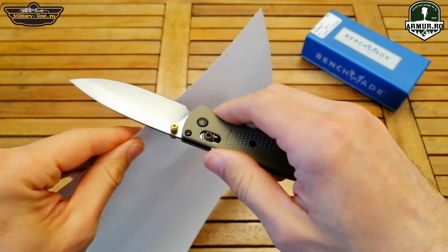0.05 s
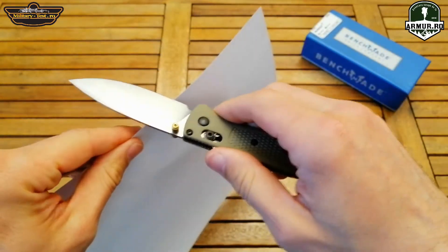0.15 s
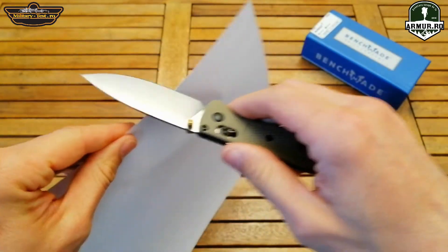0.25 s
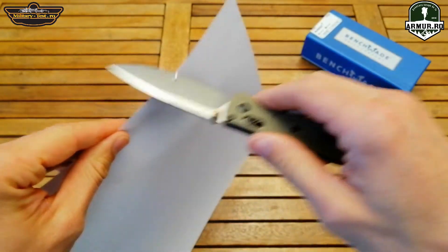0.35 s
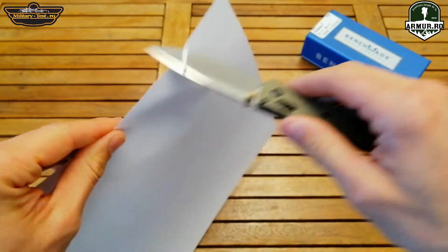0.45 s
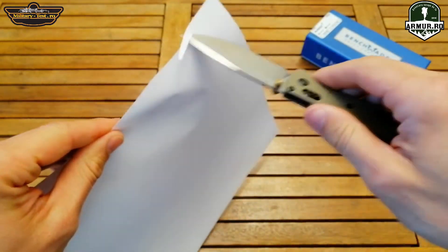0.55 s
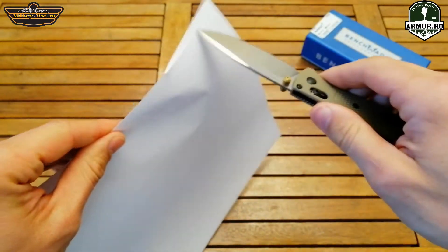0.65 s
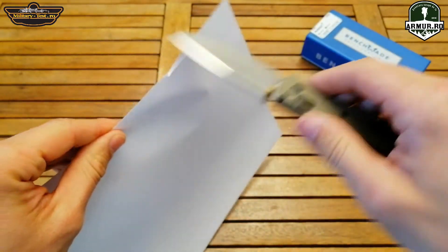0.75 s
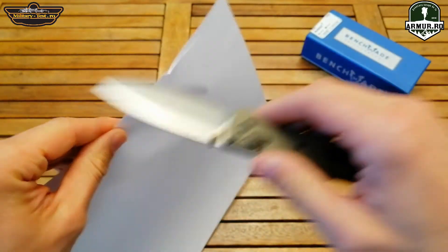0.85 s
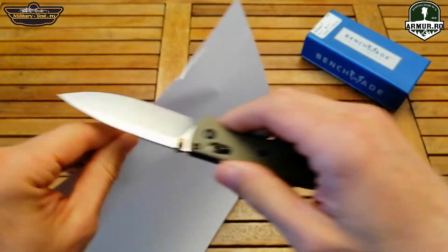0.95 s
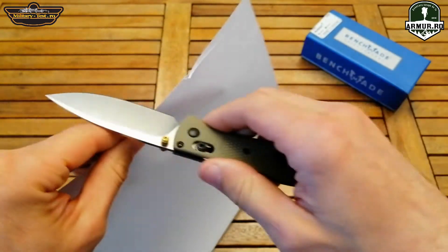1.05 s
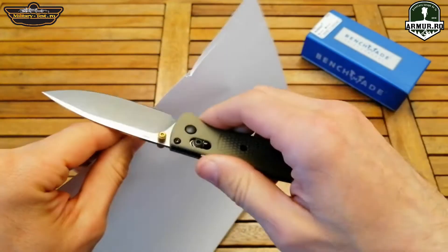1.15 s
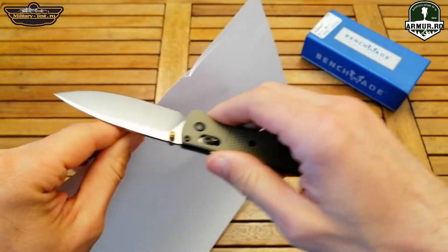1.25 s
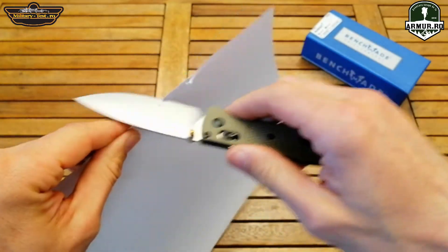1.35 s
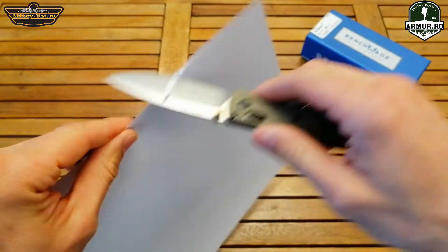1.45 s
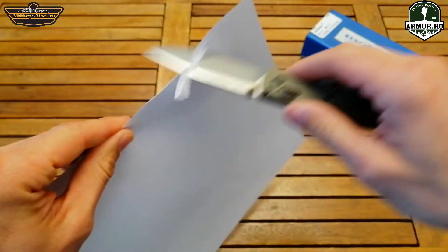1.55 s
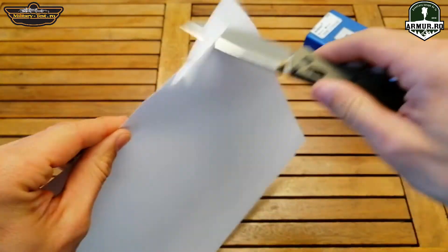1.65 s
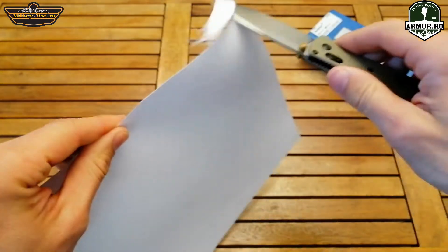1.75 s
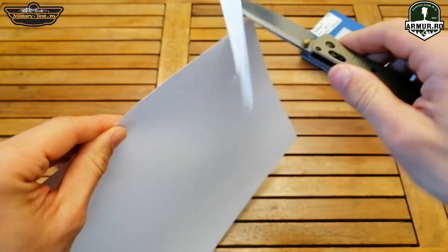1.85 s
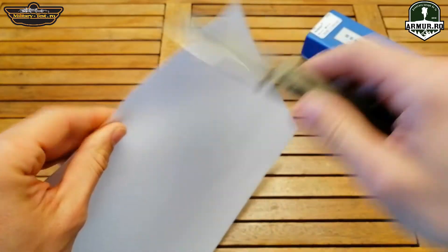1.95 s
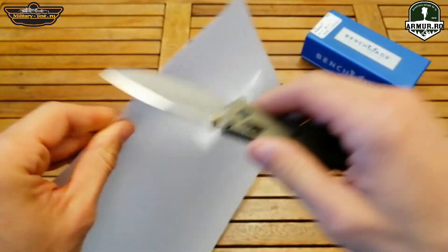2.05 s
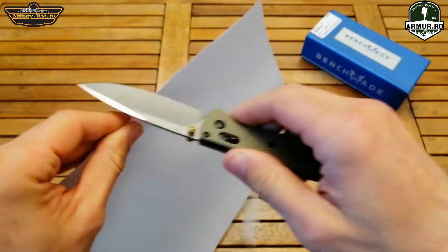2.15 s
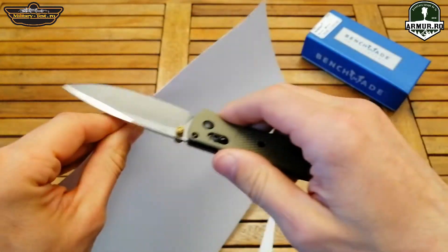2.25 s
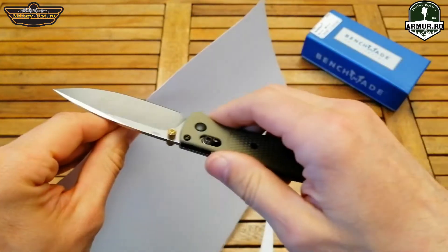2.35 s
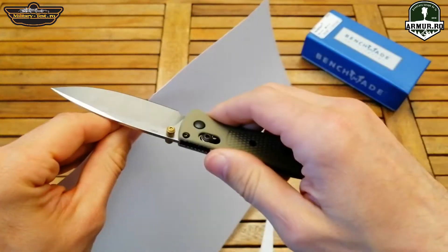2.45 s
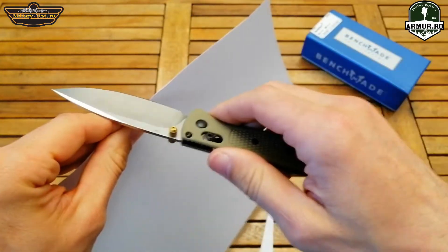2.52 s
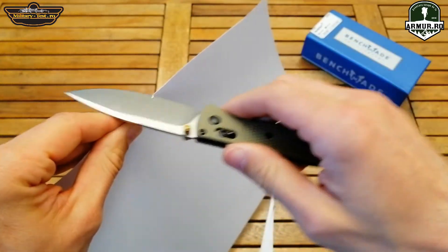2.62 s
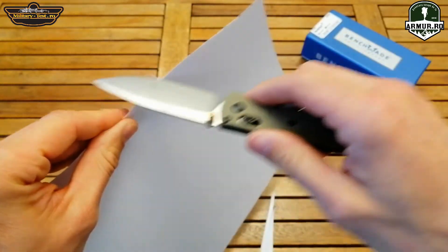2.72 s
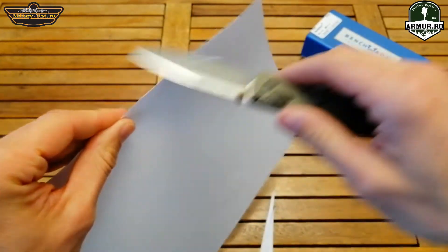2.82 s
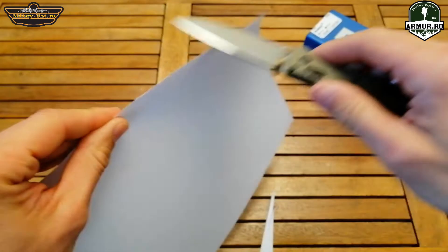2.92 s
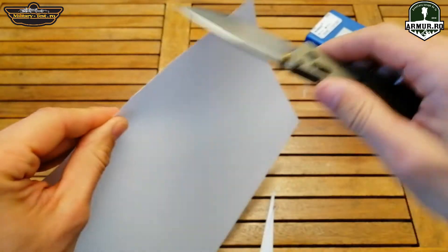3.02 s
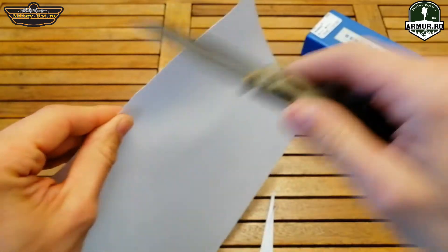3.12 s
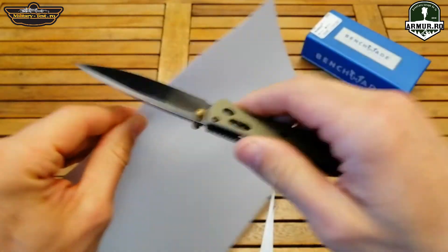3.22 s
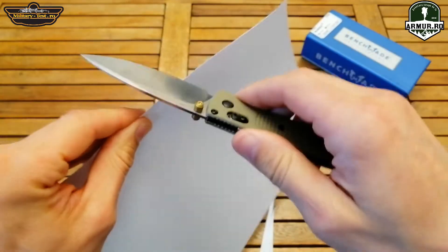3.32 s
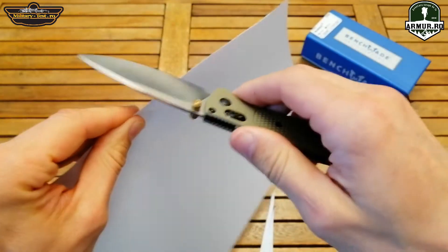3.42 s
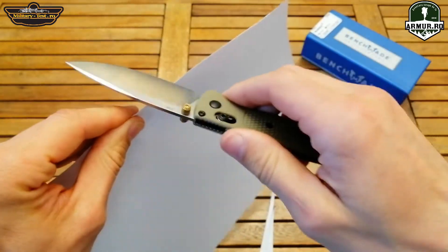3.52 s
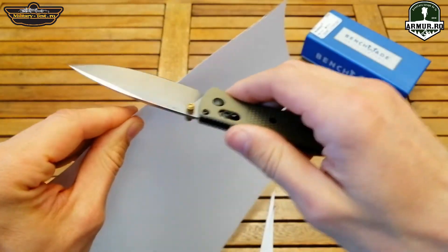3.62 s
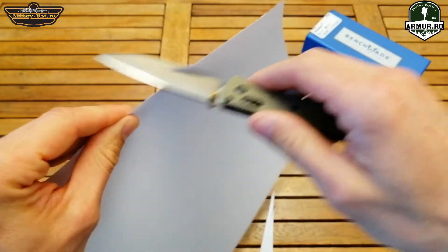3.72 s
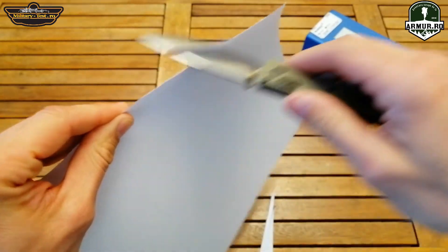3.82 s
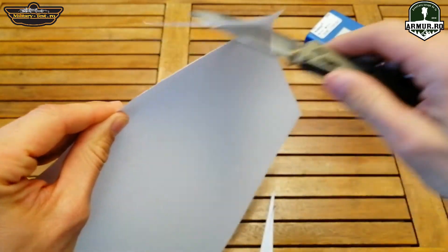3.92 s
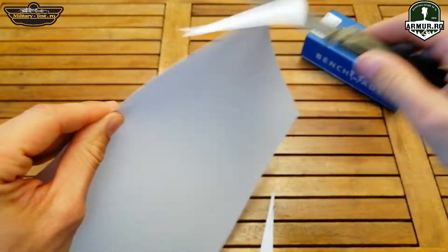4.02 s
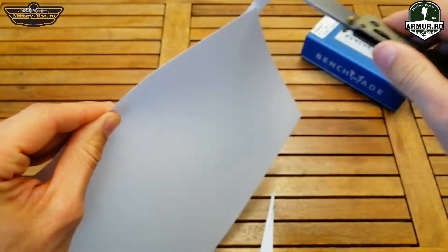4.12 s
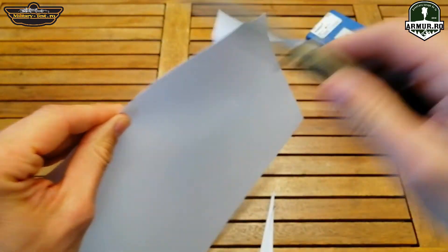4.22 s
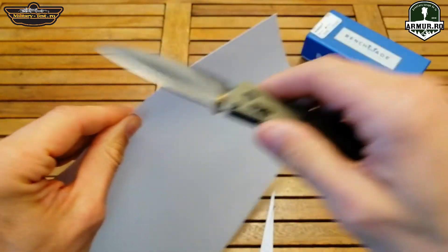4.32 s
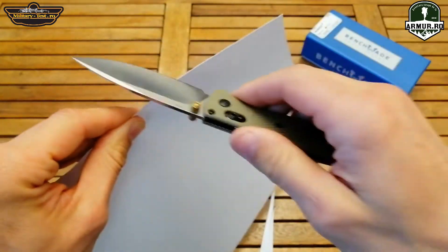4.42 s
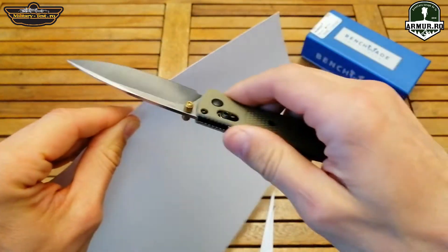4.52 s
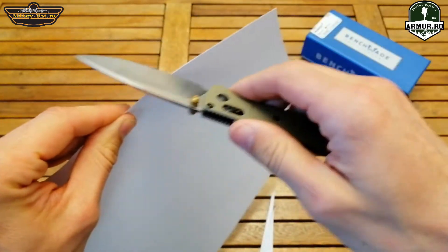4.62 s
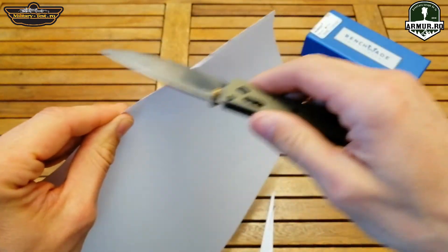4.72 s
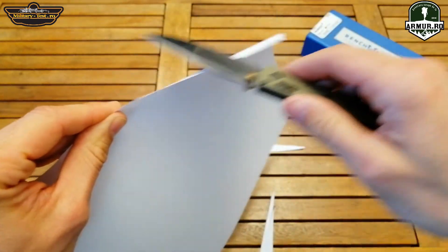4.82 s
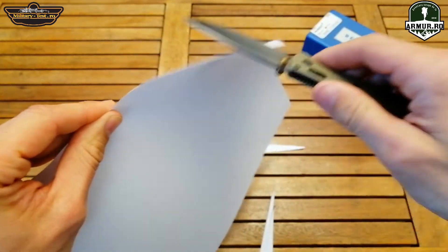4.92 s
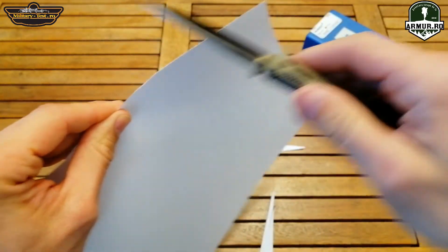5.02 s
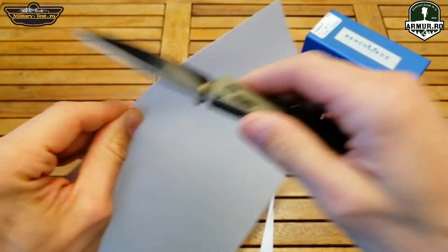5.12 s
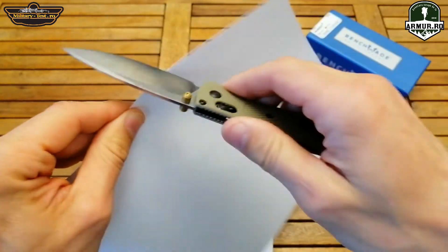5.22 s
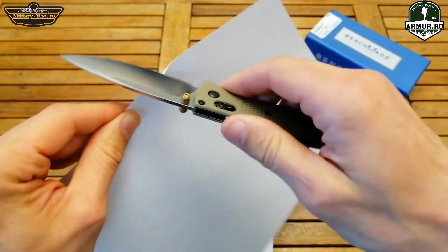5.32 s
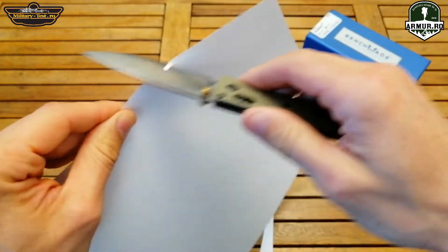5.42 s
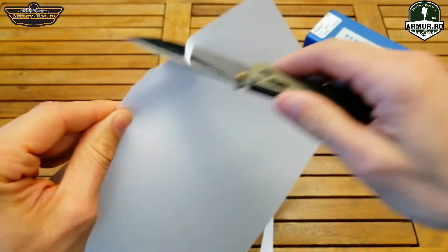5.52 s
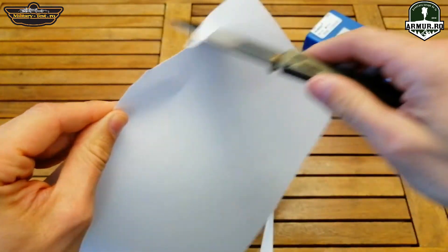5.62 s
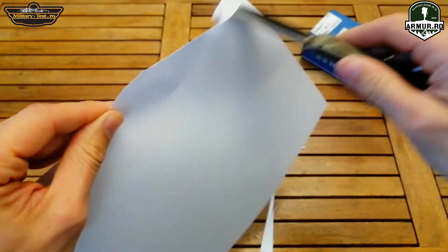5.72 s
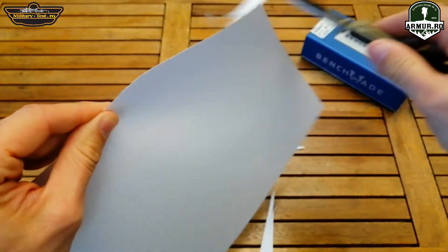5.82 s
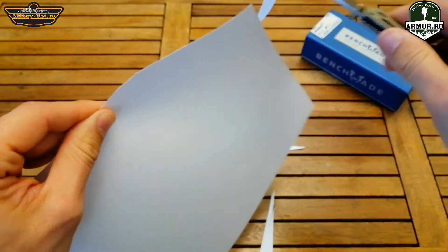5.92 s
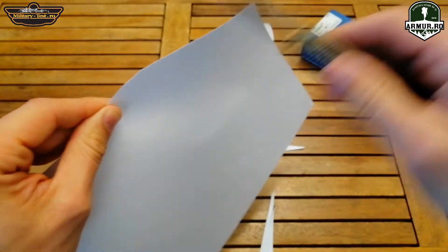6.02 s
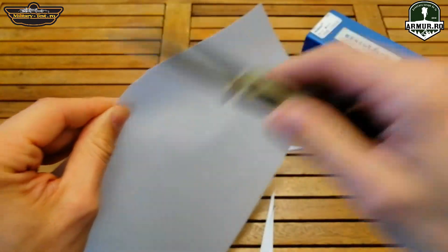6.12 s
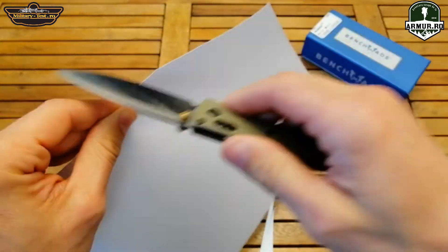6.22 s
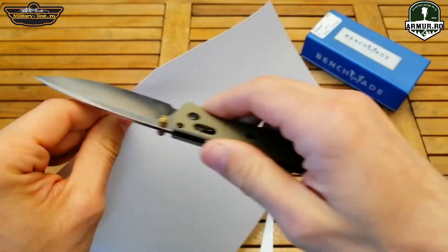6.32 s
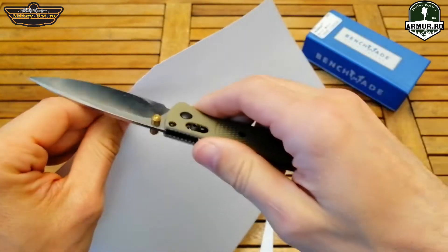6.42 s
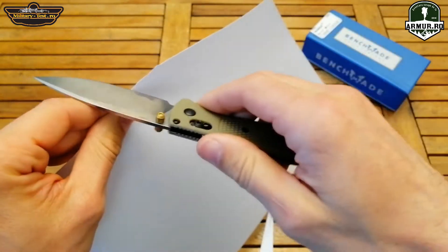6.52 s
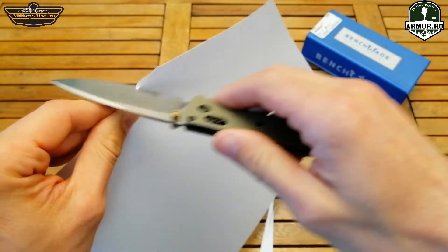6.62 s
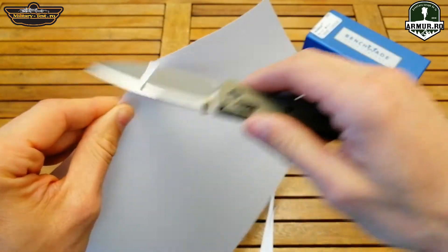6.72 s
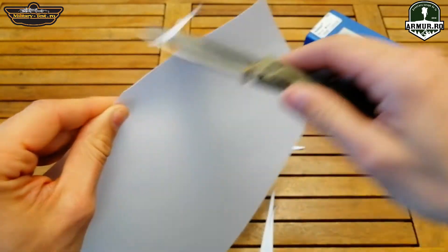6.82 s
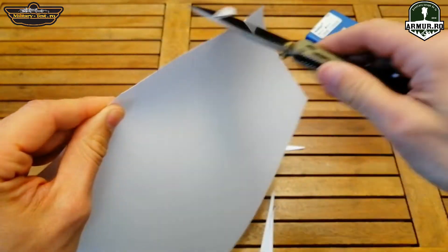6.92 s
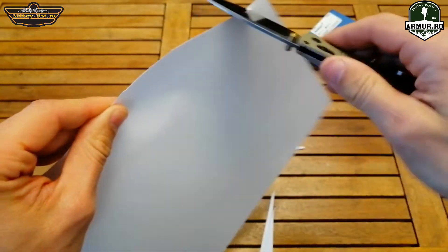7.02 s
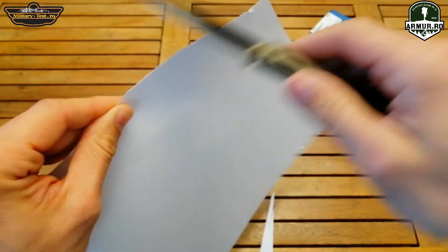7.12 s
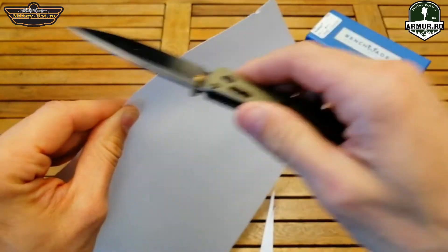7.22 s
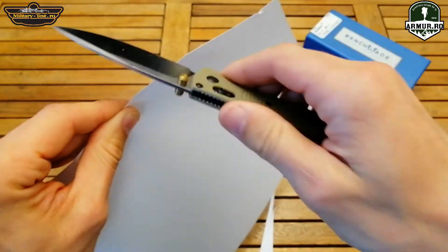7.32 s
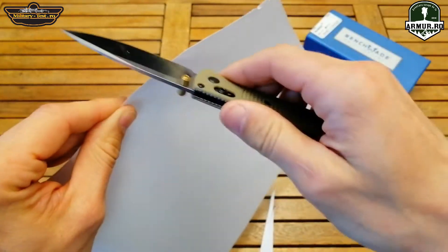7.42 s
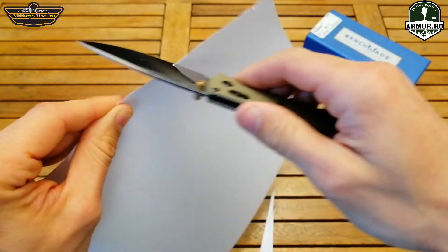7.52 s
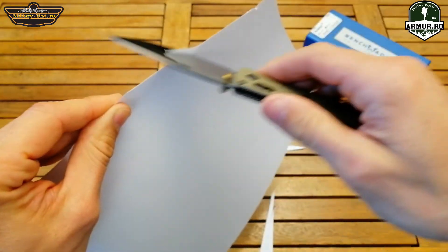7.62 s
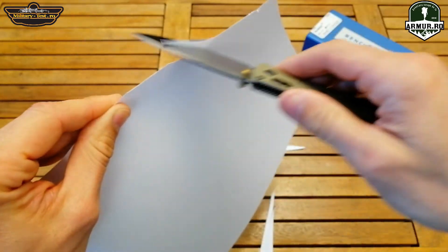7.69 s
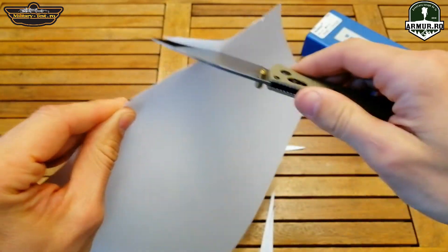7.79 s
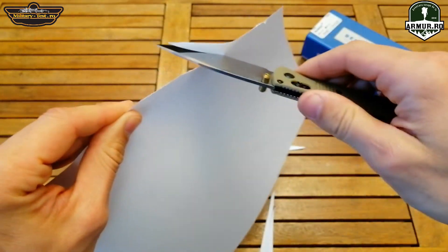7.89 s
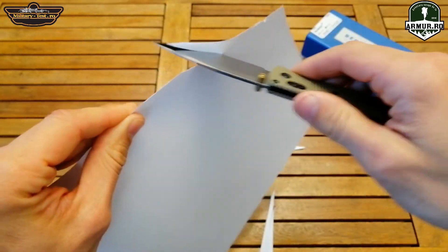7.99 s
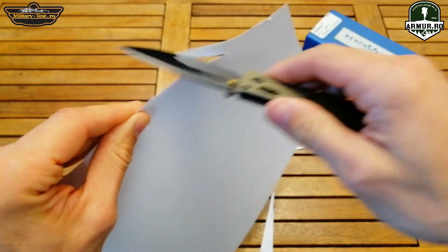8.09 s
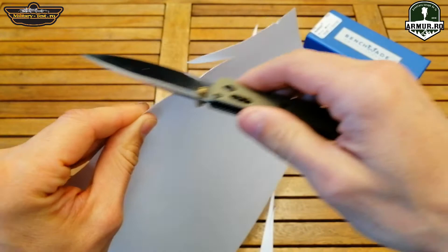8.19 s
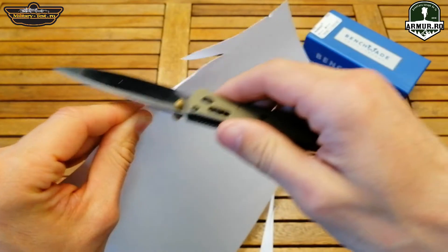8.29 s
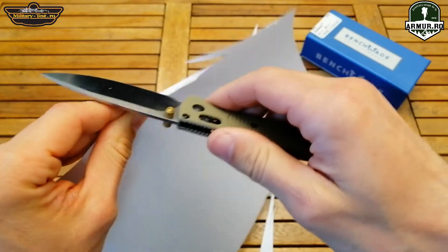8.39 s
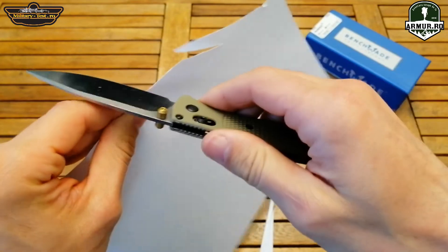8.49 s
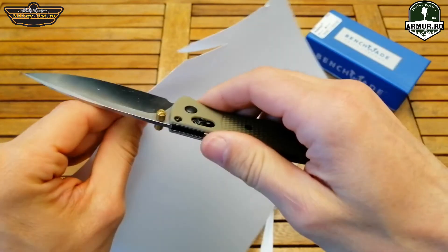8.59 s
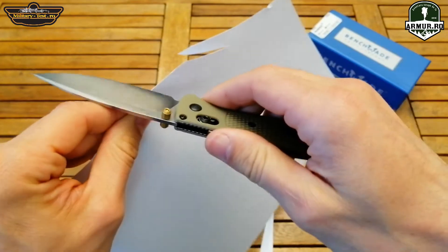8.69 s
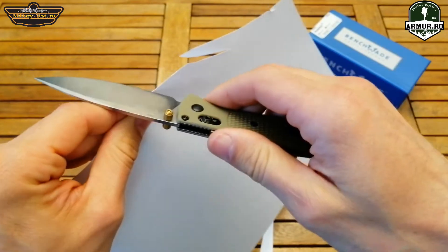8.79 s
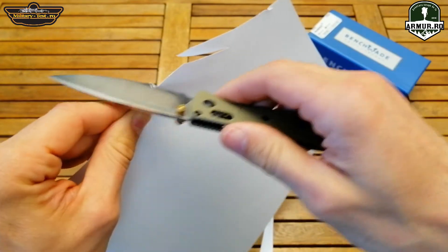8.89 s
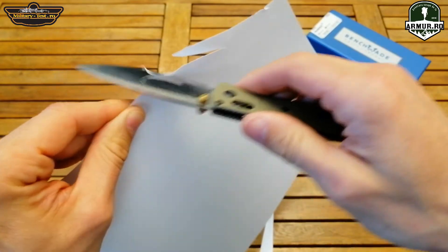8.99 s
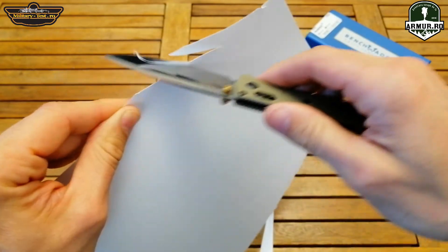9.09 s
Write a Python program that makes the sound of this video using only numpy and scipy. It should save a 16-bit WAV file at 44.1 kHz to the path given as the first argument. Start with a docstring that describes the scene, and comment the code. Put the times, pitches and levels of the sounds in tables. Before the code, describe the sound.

Quiet room, close stereo microphone, low rumble and faint hiss throughout, short reverberation. After a faint brush, a knife slices paper at 0.3 s for 0.4 s, a grainy bright rasp with a low sheet flutter. A tick and papery pop at 1.2 lead to a louder, swelling half-second zip at 1.4, ending in a tick and shudder near 1.9. Small ticks and brushes follow at 2.1-2.4. A soft cut at 2.7 runs almost into a short strong rip at 3.0, with a snap at 3.1. Another strong slice at 3.7 ends in a buckle at 4.1; light ticks at 4.5. A faint short stroke at 4.8 meets a fading one at 4.9. A fizzy, growing cut at 5.5 ends in pops at 5.9. Two strokes at 6.7 and 7.0 finish with a sharp snap. A crisp slice at 7.6, quiet brushing from 8.15 to 8.9, then a final soft cut at 8.95.

```python
"""A sharp knife slices strips off a hand-held sheet of paper; two close microphone ports hear it from one side.
Each stroke is a dense run of snapping fibres, noise pulses coloured by the sheet and the growing strip.
Between strokes the blade brushes the sheet and ticks on its edge; the loose sheet shudders in bands of
noise and buckles with short damped pops. A short reverberation and a low, swelling room tone lie behind."""
import sys
import numpy as np
from scipy import signal
from scipy.fft import rfft, irfft, next_fast_len
from scipy.io import wavfile
from scipy.ndimage import uniform_filter1d

SR = 44100
rng = np.random.default_rng(int(sys.argv[2]) if len(sys.argv) > 2 else 0)


def wrap_up_sound(samples):
    """Save the sound to the file named by the first command line argument, as 16-bit audio."""
    columns = np.atleast_2d(samples).T
    # keep every value between -1 and 1, then stretch to whole-number steps
    tamed = np.clip(columns, -1, 1)
    steps = np.round(tamed * 32767).astype(np.int16)
    wavfile.write(sys.argv[1], SR, steps)


N = 403515

# strokes of the edge: [start/s, length/s, first bite/dB, full level/dB, settling/s, release/s,
#   body re rasp/dB before SHEET_BODY_DB, fizz re rasp at start/dB, at end/dB, left re right at start/dB,
#   strip resonance at start/Hz, its height/dB, taut sheet resonance/Hz]
STROKES = [(0.296, 0.41, -55.5, -35, 0.055, 0.24, -7.5, -2, -0.5, -0.5, 4665, 9, 480),
           (1.403, 0.48, -47.5, -26, .16, 0.027, -12.5, -4, -11, -2.5, 6400, 2.5, 918),
           (2.679, 0.3, -67.5, -37, 0.048, 0.1, -8.5, -5.5, -6, -4, 7260, -0.5, 661),
           (3.024, 0.11, -54.5, -27, 0.12, 0.044, -4, -15, -9, -4, 5900, 9, 1116),
           (3.729, 0.4, -54.5, -27.5, 0.078, 0.014, -9.5, -1, -13.5, -4.5, 6720, 3, 1122),
           (4.789, 0.12, -71.5, -40, 0.034, 0.06, -2.5, -2, -4, 0, 8680, 0.5, 1000),
           (4.922, 0.18, -39.5, -66, .25, 0.062, -11, -12.5, -6, -6, 6800, 3, 910),
           (5.5, 0.43, -42, -26, 0.39, 0.052, -8, 4.5, -7.5, -2, 5450, 5, 720),
           (6.736, 0.18, -43, -34, 0.075, 0.26, -12, -3, 1, -2, 8400, 4.5, 760),
           (6.992, 0.11, -44, -26.5, 0.05, 0.038, -10.5, -26, -6.5, -9, 7000, 9, 850),
           (7.604, 0.3, -53.5, -32, 0.049, 0.014, -8, 2.5, -10.5, -4.5, 5990, 5.5, 620),
           (8.956, 0.19, -58.5, -37, 0.068, 0.11, -3.5, -5, 1, -2.5, 5400, 11.5, 750)]
SHEET_BODY_DB = 3.0  # added to the body of every stroke
# as the strip grows, the body fades, the strip curls toward the right port and its resonance sinks
BODY_DB_PER_S, CURL_DB_PER_S, STRIP_HZ_PER_S = -15, -9.5, -1200
BITE_S = 0.018  # the edge enters the paper
DULLING_POWER = 1.29  # above 1: the fizz changes mostly late in a stroke
STRIP_FORMS_S = 0.04  # the strip must come loose before it rings
SHEET_PEAK_DB, SHEET_WIDTH_HZ = 3, 260  # sheet resonance, at a new tension for each stroke
PORT_LAG_S = 0.0002086  # the right port hears the paper later


def gain_of(db):
    """Decibels to amplitude."""
    return 10 ** (np.asarray(db) / 20)


def evened(x):
    """Scales to unit rms."""
    return x / np.sqrt(np.mean(x ** 2) + 1e-20)


def read(points, hz, axis=1):
    """One column of a table, joined by straight lines over log frequency."""
    table = np.array(points, float)
    return np.interp(np.log(hz + 1), np.log(table[:, 0] + 1), table[:, axis])


def band(x, lo_hz, hi_hz, order=4):
    """Causal Butterworth band-pass."""
    sos = signal.butter(order, [lo_hz, min(hi_hz, SR / 2 - 100)], "band", fs=SR, output="sos")
    return signal.sosfilt(sos, x)


def add(mix, start_s, sound):
    """Mixes a stereo sound in at a start time."""
    part = mix[:, max(round(start_s * SR), 0):][:, :sound.shape[1]]
    part += sound[:, :part.shape[1]]


def since(start_s, length_s):
    """The samples that an event covers, and the time since its start."""
    first = max(round(start_s * SR), 0)
    at = np.arange(first, min(round((start_s + length_s) * SR), N))
    return at, (at - at[0]) / SR


def held(t, rise_s, length_s, release_s):
    """Linear rise, hold until the length, then a fall of 60 dB in the release time."""
    return np.minimum(t / rise_s, 1) * gain_of(-60 * np.maximum(t - length_s, 0) / release_s)


def slicing(voice):
    """The edge bites, settles to its full pull, and lets go as the strip comes free."""
    out = np.zeros((2, N))
    for start, length, bite_db, full_db, settle, release, body_db, fizz_start, fizz_end, pan_db, *_ in STROKES:
        at, t = since(start, length + release)
        grown = np.minimum(t, length)
        pull = gain_of(full_db + (bite_db - full_db) * np.exp(-grown / settle))
        body = SHEET_BODY_DB + body_db + BODY_DB_PER_S * grown
        fizz = fizz_start + (fizz_end - fizz_start) * (grown / length) ** DULLING_POWER
        colour = blend(voice[..., at], body, fizz, pan_db + CURL_DB_PER_S * grown)
        add(out, start, pull * held(t, BITE_S, length, release) * colour)
    return out


def paper_voice():
    """The snaps as the sheet's body, the strip's rasp and the fibres' own fizz, each at unit rms."""
    # radiation of the sheet at each port: [f/Hz, left/dB, right/dB]
    radiation = [(150, -33, -38.5), (326, -21, -25), (665, -9.5, -12), (1680, -16.5, -9),
                 (2390, -8.5, -9.5), (2870, -5.5, -1), (3900, -11, -8.5), (5480, -3, 4), (5900, -8, 3.5),
                 (7076, -7, 7), (7640, -7.5, -9), (7920, -6, -11.5), (9020, -16, -21), (12300, -28, -28),
                 (16000, -32.5, -30)]
    snaps = fibres(per_s=12000, spread_db=1.5, rub=0.44, catch_db=1.1)
    cut = ports(snaps, lambda hz: read(radiation, hz, axis=1), lambda hz: read(radiation, hz, axis=2))
    body, rasp, fizz = split(bending(cut, shared_db=3.0, own_db=2.5, width_hz=250))
    return np.array([evened(body), [evened(side) for side in rasp], evened(fizz)])


def fibres(per_s, spread_db, rub, catch_db):
    """Fibres snap in clumps as the edge catches and slips, over the smooth rub of the blade's flank."""
    sizes = gain_of(spread_db * np.minimum(rng.exponential(1, N), 4))
    snaps = (rng.random(N) < per_s / SR) * sizes
    catch = evened(band(rng.standard_normal(N), 25, 450, order=1))
    return (evened(snaps) + rub) * gain_of(catch_db * catch) * rng.standard_normal((2, N))


def ports(pair, left=None, right=None):
    """Two unrelated signals become the partly alike, slightly delayed sound of the sheet at two ports."""
    # likeness of the two ports: [f/Hz, correlation 0-1]
    likeness = [(100, 0.99), (700, 1), (1500, 0.49), (2400, 0.81), (3500, 0.04), (14000, 0.59)]
    size = next_fast_len(pair.shape[1] + 512)
    hz, (a, b) = np.fft.rfftfreq(size, 1 / SR), rfft(pair, size)
    same = np.clip(read(likeness, hz), 0, .99)
    partly_alike = same * a + np.sqrt(1 - same ** 2) * b
    z = np.array([a, partly_alike * np.exp(-2j * np.pi * hz * PORT_LAG_S)])
    if left is not None:
        z *= gain_of([left(hz), right(hz)])
    return irfft(z, size)[:, :pair.shape[1]]


def bending(x, shared_db, own_db, width_hz):
    """The strip's resonance glides as it is cut free; narrow bands rise and fall as the sheet bends."""
    hz, t, z = signal.stft(x, SR, nperseg=512, noverlap=384)
    drift = rng.standard_normal((len(t), len(hz), 3)).T
    for size, axis in ((3, 1), (24, 2), (10, 2)):  # smooth over frequency, then twice over time
        drift = uniform_filter1d(drift, size=size, axis=axis)
    drift = evened(drift)
    treble = np.minimum(hz / 3400, 1)[:, None]  # long waves reach both ports alike
    wander_db = shared_db * drift[2] + own_db * treble * drift[:2]
    z *= gain_of(resonances(hz[:, None], t, width_hz) + wander_db)
    return signal.istft(z, nperseg=512, noverlap=384)[1][:, :N]


def resonances(hz, t, width_hz):
    """Lift in dB from the sheet's resonance and the strip's, which forms and then sinks as the strip grows."""
    cuts = np.array(STROKES)
    latest = np.maximum(np.searchsorted(cuts[:, 0], t) - 1, 0)
    start, length, *_, strip_hz, height_db, sheet_hz = cuts[latest].T
    grown = np.clip(t - start, 0, length)
    formed_db = height_db * (1 - np.exp(-grown / STRIP_FORMS_S)) * (t < start + length)
    strip = formed_db / (1 + ((hz - strip_hz - STRIP_HZ_PER_S * grown) / width_hz) ** 2)
    return strip + SHEET_PEAK_DB / (1 + ((hz - sheet_hz) / SHEET_WIDTH_HZ) ** 2)


def split(x):
    """Body, rasp and fizz: three registers, parted at 2300 and 8000 Hz, that add up to the whole."""
    size = next_fast_len(N)
    hz, z = np.fft.rfftfreq(size, 1 / SR), rfft(x, size)
    low = 1 / (1 + (hz / 2300) ** 10)
    high = 1 - 1 / (1 + (hz / 8000) ** 24)
    return [irfft(z * share, size)[:, :N] for share in (low, 1 - low - high, high)]


def blend(voice, body_db, fizz_db, pan_db):
    """Body and fizz around the rasp, which the strip turns toward one port or the other."""
    body, rasp, fizz = voice
    right_share = 1 / (1 + gain_of(pan_db) ** 2)  # of the power
    turn = np.sqrt([2 * (1 - right_share), 2 * right_share]).reshape(2, -1)
    return gain_of(body_db) * body + turn * rasp + gain_of(fizz_db) * fizz


def brushing(voice, fizz_db=-4, pan_db=-6, arch_power=0.52):
    """The blade's flank slides lightly over the sheet without cutting, swelling and fading in one arch."""
    # brushes: [start/s, length/s, level/dB, body re rasp/dB]
    brushes = [(0.13, 0.17, -68.5, 5.5), (0.827, 0.033, -54.5, -16), (1.139, 0.043, -69, 0),
               (2.299, 0.13, -59, -10), (3.337, 0.037, -68, 3.5), (3.694, 0.048, -60.5, -8),
               (5.1, .16, -83, 12), (5.249, 0.02, -59, -1), (5.427, 0.041, -54.5, -3.5),
               (6.285, 0.071, -59, -13), (6.668, 0.091, -54.5, -8.5), (8.151, 0.041, -50.5, -8.5),
               (8.197, 0.19, -59.5, -33), (8.366, .18, -53.5, -6), (8.554, 0.065, -53, -7.5),
               (8.828, 0.068, -55, 1.5)]
    out = np.zeros((2, N))
    for start, length, db, body_db in brushes:
        at, t = since(start, length)
        arch = abs(np.sin(np.pi * t / length)) ** arch_power
        add(out, start, gain_of(db) * arch * blend(voice[..., at], body_db, fizz_db, pan_db))
    return out


def ticks(snap_s=0.0012, scuff_s=0.0087, scuff=0.13):
    """Blade or strip on the paper's edge: a sharp snap, then a brief scuff as the paper slides off the blade."""
    # ticks: [t/s, peak level/dB]
    tick_events = [(1.2215, -23), (1.8937, -26), (2.1139, -35.5), (2.3367, -30), (2.389, -42), (3.064, -35),
                   (3.0997, -23), (4.466, -43.5), (4.5103, -33), (4.579, -42.5), (5.386, -51),
                   (5.434, -40.5), (5.9232, -27), (6.291, -43.5), (6.6225, -45), (7.0439, -21)]
    # colour of a tick: [f/Hz, gain/dB]
    tick_tone = [(200, -11), (1500, -1.5), (3800, -1.5), (6200, 4), (8500, -2), (14000, -35.5)]
    out, t = np.zeros((2, N)), np.arange(4000) / SR
    tone = lambda hz: read(tick_tone, hz)
    decay = np.exp(-t / snap_s) + scuff * np.exp(-t / scuff_s)
    for start, db in tick_events:
        burst = rng.standard_normal((2, len(t))) * decay
        # 22 samples of lead: the zero-phase colour spreads ahead of the snap
        tick = ports(np.pad(burst, ((0, 0), (22, 0))), tone, tone)
        add(out, start, gain_of(db) * tick / abs(tick.mean(0)).max())
    return out


def flutter(rise_s=0.012, release_s=0.17, edge_ratio=1.564):
    """The loose sheet shudders in irregular flaps: low when all of it moves, higher when a corner does."""
    # shudders: [start/s, length/s, level/dB, band centre/Hz]
    shudders = [(0.353, 0.24, -53, 220), (1.445, 0.088, -60.5, 220), (1.818, 0.087, -51, 210),
                (2.102, 0.048, -55, 200), (2.302, 0.037, -54.5, 1000), (2.503, 0.044, -68, 700),
                (2.857, 0.33, -61, 150), (4.102, 0.061, -56.5, 190), (5.118, 0.14, -54.5, 150),
                (5.119, .14, -55, 700), (5.687, 0.073, -63, 200), (5.89, 0.075, -53, 160),
                (6.985, 0.1, -55.5, 230), (7.329, 0.027, -59, 170), (7.593, 0.084, -53.5, 210)]
    flaps = ports(fibres(per_s=440, spread_db=1.5, rub=0.99, catch_db=2.0))
    out = np.zeros((2, N))
    for start, length, db, hz in shudders:
        at, t = since(start, length + release_s)
        shudder = evened(band(flaps[:, at], hz / edge_ratio, hz * edge_ratio, order=3))
        add(out, start, gain_of(db) * held(t, rise_s, length, release_s) * shudder)
    return out


def buckles(lift_db=3.0, edge_ratio=1.524, t60_s=0.091):
    """A bulge pops through and rings the heavily damped sheet around one pitch."""
    # buckles: [t/s, peak level/dB before lift_db, pitch/Hz]
    pops = [(1.221, -36.5, 980), (1.804, -36.5, 1320), (2.012, -52, 664), (2.113, -44, 656.2),
            (2.337, -40.5, 910), (2.522, -49, 666), (2.885, -38, 536), (3.692, -46.5, 740),
            (4.07, -29, 1160), (5.124, -47, 503), (5.386, -36, 550), (5.403, -43, 396), (5.515, -34.5, 844),
            (5.919, -31.5, 750), (5.94, -32.5, 770), (6.621, -45.5, 450), (6.97, -36.5, 710),
            (7.041, -31.5, 800), (7.314, -56.5, 610), (7.356, -60, 583), (7.609, -35, 565),
            (7.621, -34.5, 700), (8.403, -54, 479)]
    out, t = np.zeros((2, N)), np.arange(8000) / SR
    for start, db, hz in pops:
        push = rng.standard_normal((2, len(t))) * gain_of(-60 * t / t60_s)
        pop = ports(band(push, hz / edge_ratio, hz * edge_ratio, order=2))
        add(out, start, gain_of(db + lift_db) * pop / abs(pop.mean(0)).max())
    return out


def room(x, early_db=-13.0):
    """A few nearby reflections, then a tail of sparse taps, each band dying at its own speed."""
    # reverberation: [f/Hz, t60/s, level/dB]
    reverberation = [(200, 0.4, -10.5), (895, 0.39, -7.5), (3020, 0.44, -7), (6900, 0.45, -13.5),
                     (13000, 0.051, 0)]
    count = SR // 2
    late = np.arange(count) / SR > .009
    taps = rng.choice([-1., 1.], (2, count)) * (rng.random((2, count)) < .1) * late
    hz, t, z = signal.stft(taps, SR, nperseg=256)
    t60 = np.maximum(read(reverberation, hz), .05)[:, None]
    level_db = read(reverberation, hz, axis=2)[:, None]
    tail_energy = .1 * SR * t60 / np.log(1e6)  # divided out: the level does not hang on t60
    z *= gain_of(level_db - 60 * t / t60) / np.sqrt(tail_energy)
    response = signal.istft(z, SR, nperseg=256)[1]
    for side in response:
        side[rng.integers(60, 800, 8)] += gain_of(early_db) * rng.choice([-1, 1], 8) / np.sqrt(8)
    return signal.fftconvolve(x, response, axes=1)[:, :N]


def room_tone(level_db=-64.0, same=0.38, swell_db=2.5):
    """Low rumble of the building, slowly swelling, under faint microphone hiss."""
    # spectrum shape: [f/Hz, relative density/dB]
    hush = [(12, 1.5), (20, 7), (213, -0.5), (324, -7), (519, -8.5), (1870, -19.5), (3170, -18.5),
            (3960, -24), (6910, -24), (15500, -28)]
    size = next_fast_len(N)
    noise, hz = rng.standard_normal((3, size)), np.fft.rfftfreq(size, 1 / SR)
    z = rfft(same * noise[2] + (1 - same) * noise[:2]) * gain_of(read(hush, hz))
    low = 1 / (1 + (hz / 260) ** 4)
    swell = evened(irfft(rfft(rng.standard_normal(size)) * (hz < 4), size))
    rumble = irfft(z * low, size) * gain_of(swell_db * swell)
    hiss = irfft(z * (1 - low), size)
    return gain_of(level_db) * evened((rumble + hiss)[:, :N])


def scene():
    """Knife and paper in the room."""
    voice = paper_voice()
    paper = slicing(voice) + brushing(voice) + ticks() + flutter() + buckles()
    return paper + room(paper) + room_tone()


def record(dry, edge_hz=15800):
    """The recorder's band limit: a linear-phase low-pass, its delay removed."""
    lowpass = signal.firwin(511, edge_hz, window=("kaiser", 9), fs=SR)
    return signal.oaconvolve(dry, lowpass[None], "same")


dry = scene()
out = record(dry)
wrap_up_sound(out)
```